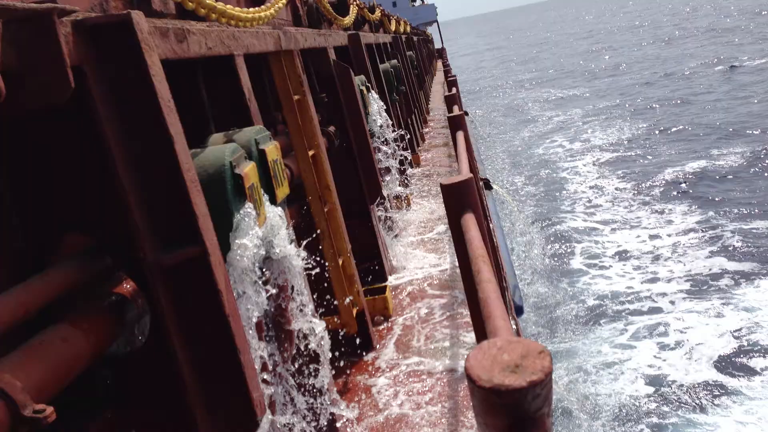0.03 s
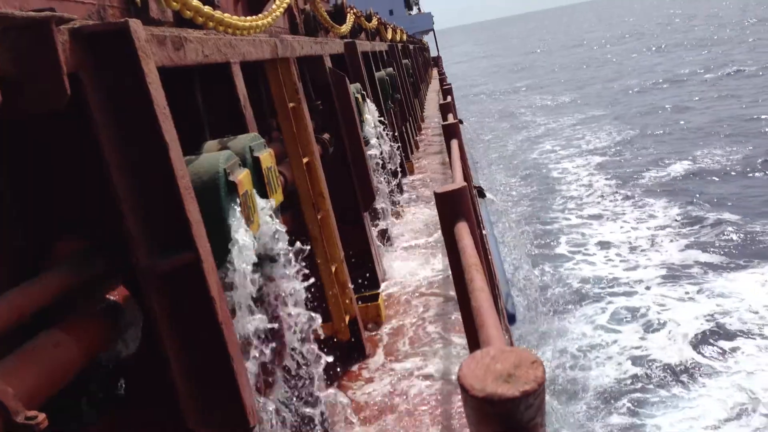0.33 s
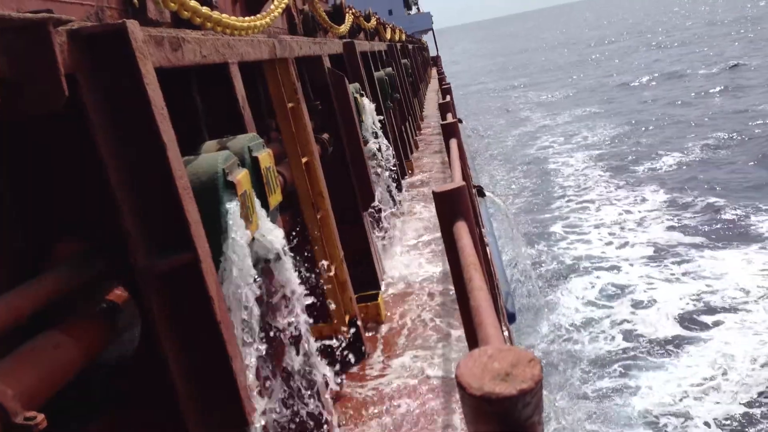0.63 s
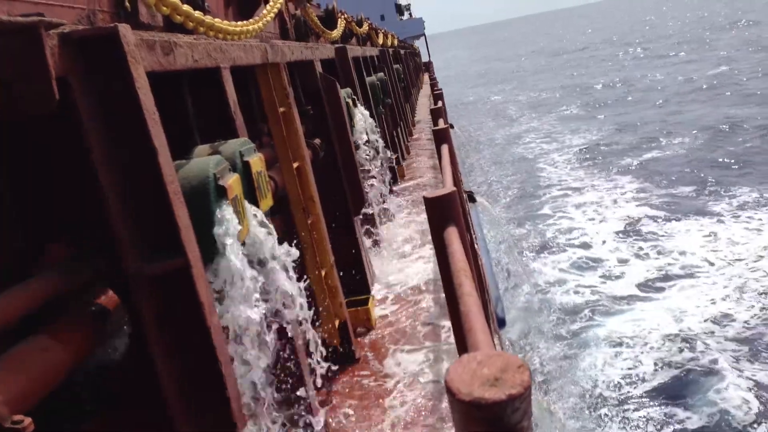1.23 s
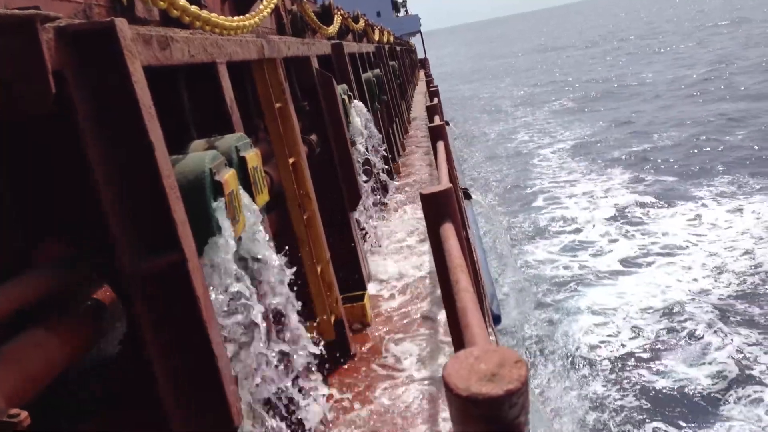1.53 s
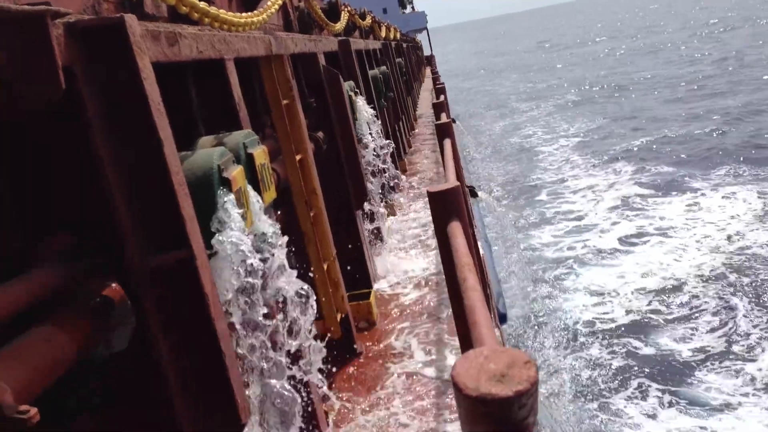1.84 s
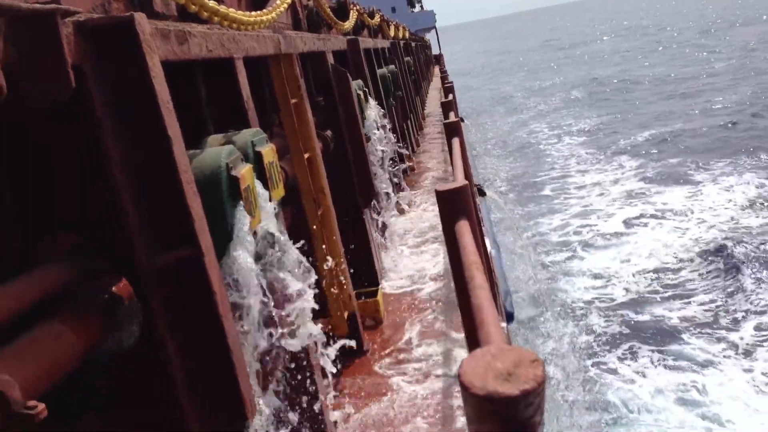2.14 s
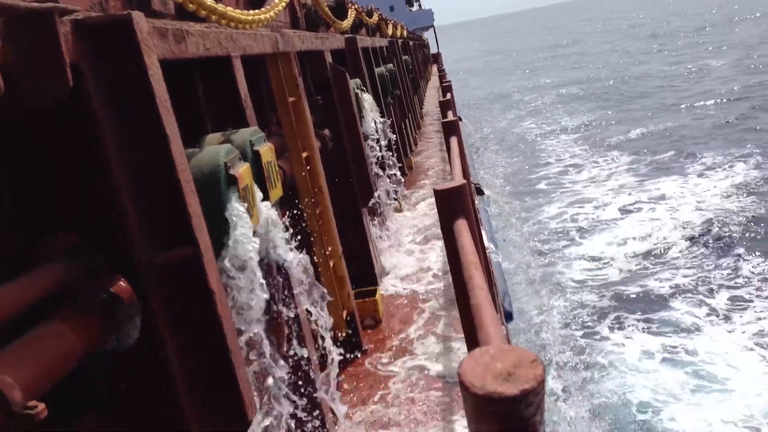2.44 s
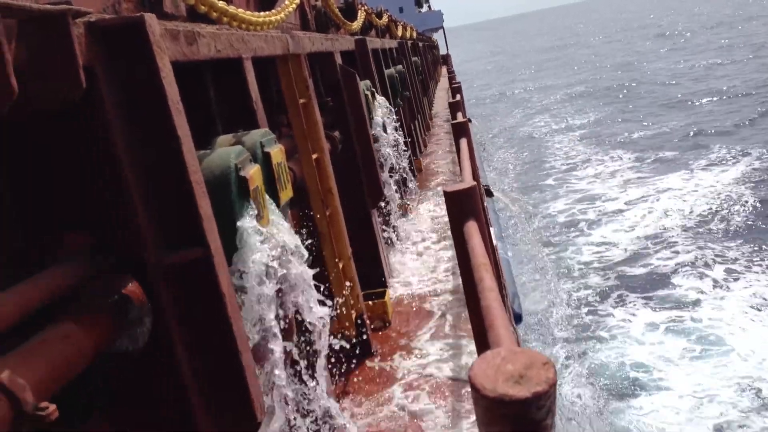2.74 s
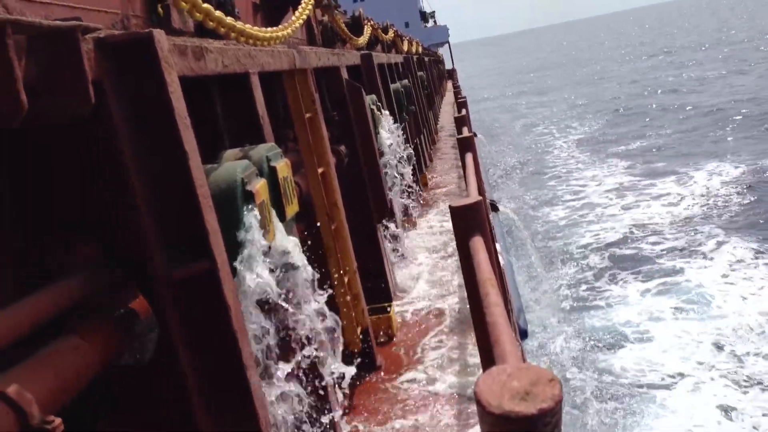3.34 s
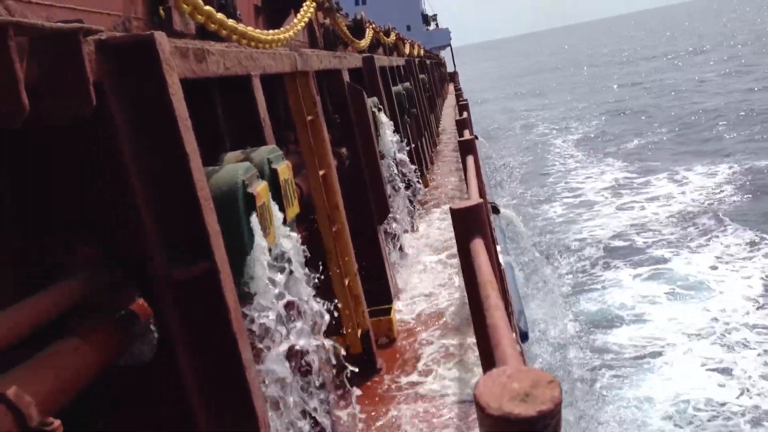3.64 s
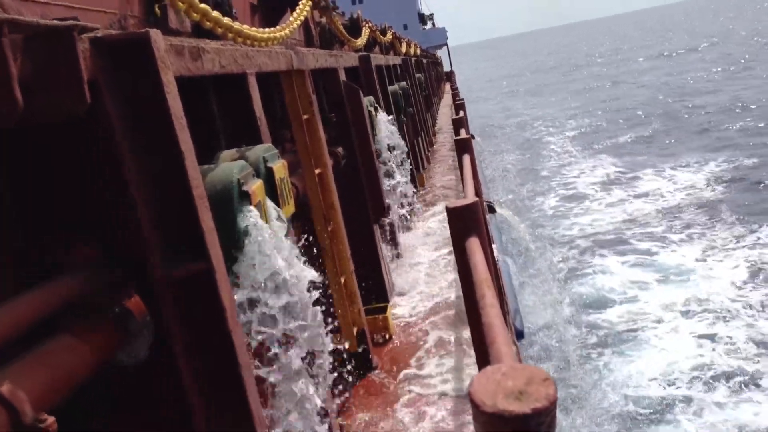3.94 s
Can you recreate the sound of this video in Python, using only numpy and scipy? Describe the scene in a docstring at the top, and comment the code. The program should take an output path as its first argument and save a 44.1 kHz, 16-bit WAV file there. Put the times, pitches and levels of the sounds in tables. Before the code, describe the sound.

Water gushes from vents and splashes steadily onto a ship's steel deck, bubbling and spraying, with occasional sharper slaps. The ship and sea drone low underneath, while wind buffets the microphone in short thumps, mostly around the middle.

```python
"""Steel side deck of a ship under way. Water gushes from tank vents and lands in lumps,
bursting into drops, ringing bubbles and spray. Ship and sea drone low underneath.
Wind eddies buffet the microphone in short, blunt thumps.
Big lumps of water slap the plating: a crack, then a scatter of drops."""
import sys
import numpy as np
from scipy import signal
from scipy.fft import rfft, irfft
from scipy.io import wavfile
from scipy.ndimage import uniform_filter1d

SR = 44100
rng = np.random.default_rng(int(sys.argv[2]) if len(sys.argv) > 2 else 0)


def bounce(signal):
    """Save signal as a 16-bit WAV file at the path given by the first command-line argument."""
    frames = np.transpose(np.atleast_2d(signal))
    limited = np.clip(frames, -1, 1)
    pcm = np.round(limited * 32767).astype(np.int16)
    wavfile.write(sys.argv[1], SR, pcm)


N = 176400


def undb(db):
    """Decibels to gain."""
    return 10 ** (np.asarray(db) / 20)


def unit(x):
    """Scale to rms 1."""
    return x / np.sqrt(np.mean(x ** 2) + 1e-18)


def colour(x, points, shift=1):
    """Causal filter of unit power gain through (Hz, dB) points; shift scales their frequencies."""
    hz, db = np.array(points).T
    n = 2 * len(x)
    bins_hz = np.arange(n // 2 + 1) * SR / n
    gain = unit(undb(np.interp(np.log(bins_hz + 1), np.log(hz * shift), db)))
    cepstrum = irfft(np.log(gain))
    cepstrum[1:n // 2] *= 2  # fold to minimum phase
    cepstrum[n // 2 + 1:] = 0
    return irfft(rfft(x, n) * np.exp(rfft(cepstrum)))[:len(x)]


def walk(rate_hz):
    """Smooth random wander, rms 1."""
    span = int(SR / rate_hz)
    smoothed = uniform_filter1d(rng.standard_normal(N), span, mode="wrap")
    return unit(uniform_filter1d(smoothed, span, mode="wrap"))


def impacts(per_s, spread_db):
    """Impulses of random time and size."""
    hits = rng.random(N) < per_s / SR
    return hits * undb(spread_db * np.clip(rng.standard_normal(N), -2.5, 2.5))


def fade(x, decay_s):
    """Exponential tail on each impulse."""
    return signal.lfilter([1], [1, -np.exp(-1 / (decay_s * SR))], x)


def mix(a, b, share):
    """Blend; share is b's fraction of the power."""
    share = np.clip(share, 0, 1)
    return np.sqrt(1 - share) * unit(a) + np.sqrt(share) * unit(b)


def lumps(steady_s=0.14):
    """Power of the landing water, mean about 1: each lump arrives at once and drains away."""
    power = fade(impacts(per_s=130, spread_db=4) ** 2, decay_s=0.014) + 1e-9
    # the vents deliver about the same amount in any span of steady_s
    return power / uniform_filter1d(power, int(steady_s * SR))


def patter(wash_share):
    """Separate drop impacts in a wash of drops too fine to tell apart."""
    drops = impacts(per_s=5000, spread_db=2.5) * np.sign(rng.standard_normal(N))
    return mix(drops, rng.standard_normal(N), wash_share)


def bubbles(median_hz=2189, spread_oct=0.3, decay_cycles=17.2, rise_per_decay=0.0346, size=2048):
    """Air trapped in the water on deck rings briefly, rising in pitch."""
    out = np.zeros(N + size)
    t = np.arange(size) / SR
    births = impacts(per_s=350, spread_db=7)
    octaves = spread_oct * rng.standard_normal(N)
    for i in np.flatnonzero(births):
        hz = min(median_hz * 2 ** octaves[i], 7800)
        age = t * hz / decay_cycles
        phase = 2 * np.pi * hz * t * (1 + rise_per_decay * age / 2)
        out[i:i + size] += births[i] * np.exp(-age) * np.sin(phase)
    return unit(out[:N])


def stream(splash_surge=0.52, spray_surge=0.45):
    """Falling water: splash, bubbles and spray surge with the same lumps, over an even pour."""
    # stream envelope (time [s], body gain [dB], spray gain [dB])
    flow = [(0.15, -30.5, -35), (0.29, -29.5, -34.5), (0.43, -28.5, -34.5), (0.57, -31, -34.0),
            (0.71, -31.5, -34.5), (0.85, -31.5, -33.0), (0.99, -29.5, -32.5), (1.13, -31, -34.5),
            (1.27, -31, -34.5), (1.41, -31.5, -33.5), (1.55, -31, -34.0), (1.69, -28.5, -32),
            (1.83, -30, -36), (1.97, -31, -34), (2.11, -32, -34), (2.25, -31.5, -34.5),
            (2.39, -32.0, -33.5), (2.53, -30.5, -35.5), (2.67, -32.5, -35.5), (2.81, -31.5, -37.5),
            (2.95, -32.5, -36.5), (3.09, -31.5, -34), (3.23, -30.5, -36), (3.37, -31.5, -36.5),
            (3.51, -30.5, -35.5), (3.65, -30.0, -34), (3.79, -30, -34.5), (3.93, -28.5, -34.0)]
    # splash and spray spectra (frequency [Hz], relative density [dB])
    splash_spectrum = [(40, -39), (300, -26.5), (600, -11), (1000, -6.5), (1500, -2.5), (2000, 0.5),
                       (2450, 1), (2900, -2.5), (3600, -9.5), (6000, -25.5)]
    spray_spectrum = [(100, -50), (1500, -29), (3000, -6), (4000, -4), (5300, 0.5), (6100, -2.5),
                      (7200, -2), (9000, -8), (12000, -10.5), (15500, -14)]
    t = np.arange(N) / SR
    time_s, body_db, spray_db = np.array(flow).T
    power = lumps()
    heavy = np.sqrt(1 + splash_surge * (power - 1))  # surge: share of power arriving in lumps
    fine = np.sqrt(1 + spray_surge * (power - 1))
    splash = undb(-0.5) * colour(heavy * patter(wash_share=0.25), splash_spectrum)
    body = splash + undb(-7) * heavy * bubbles()
    spray = undb(0.32) * colour(fine * patter(wash_share=0.53), spray_spectrum)
    return body * undb(np.interp(t, time_s, body_db)) + spray * undb(np.interp(t, time_s, spray_db))


def drone(level_db=-40.5, waver_db=0.7):
    """Low, wavering rumble of the ship and the sea along its hull."""
    # rumble spectrum (frequency [Hz], relative density [dB])
    spectrum = [(20, -52), (32, -43), (50, -26.5), (80, -17), (105, -10.5), (130, -6.5), (175, -1),
                (240, -5), (400, -11), (550, -6.5), (800, -9), (1600, -26)]
    gain = undb(level_db + waver_db * walk(rate_hz=7.2))
    return gain * colour(rng.standard_normal(N), spectrum)


def wind(lopside=0.26, push_s=0.005, size=8192):
    """Each eddy swells fast on the microphone and dies slower; short ones are more push than flutter."""
    # eddies (peak time [s], length [s], level [dB], spectrum shift [octaves])
    buffets = [(0.334, 0.054, -37, 0.19), (0.39, 0.019, -21.5, 0.31), (0.637, 0.016, -29, 0.056),
               (.687, .02, -33, 0.17), (1.51, 0.035, -46, -1.2), (1.592, 0.015, -24, -0.38),
               (1.64, 0.064, -33, -0.54), (1.672, 0.0068, -17, 0.75), (1.686, 0.024, -16.5, -0.22),
               (1.71, .03, -18, -0.28), (1.755, 0.036, -17, 0.12), (1.785, 0.022, -21.5, -0.25),
               (1.814, 0.013, -28.5, -0.34), (1.867, 0.018, -23, 0.22), (1.902, 0.018, -11, -0.0069),
               (1.924, 0.017, -19, 0.055), (2.09, 0.038, -36.5, -.1), (2.223, 0.022, -21, 0.21),
               (2.293, 0.02, -31.5, -0.43), (2.549, 0.017, -30.5, 0.18), (2.584, 0.011, -25.5, -.1),
               (2.643, 0.0087, -9, 0.014), (2.856, 0.016, -27, -0.54), (2.914, 0.024, -35, -0.28),
               (3.115, 0.0094, -31.5, 0.12), (3.15, 0.012, -19.5, -0.13), (3.166, 0.027, -26.5, -.1),
               (3.211, 0.033, -29, -0.012), (3.481, 0.026, -36, -1.2), (3.636, 0.024, -31, -0.2),
               (3.659, 0.012, -23, 0.056), (3.851, 0.025, -23, 0), (3.957, 0.03, -22.5, 0.52)]
    # buffet spectrum (frequency [Hz], relative density [dB])
    spectrum = [(20, -52), (45, -27), (80, -36), (125, -5.5), (190, 1.5), (260, 4.5), (350, -0.5), (480, 0),
                (650, -6.5), (900, -18), (1400, -26.5), (3500, -50)]
    out = np.zeros(N + 2 * size)
    t = (np.arange(size) - size // 2) / SR
    push = 1.0 * (t == 0)
    for time_s, length_s, level_db, shift_oct in buffets:
        width_s = length_s * (1 + lopside * np.sign(t))
        swell = np.exp(-2 * (t / width_s) ** 2)
        flutter = swell * rng.standard_normal(size)
        pressure = mix(flutter, push, share=push_s / length_s)
        thump = unit(colour(pressure, spectrum, shift=2.0 ** shift_oct))
        i = int(time_s * SR) - size // 2
        out[i:i + size] += undb(level_db) * thump * np.sqrt(np.mean(swell ** 2))
    return out[:N]


def burst(hits, crack_db=20, decay_s=0.0072):
    """Each hit cracks, crack_db above the short scatter of drops that follows."""
    scatter = fade(hits, decay_s) * rng.standard_normal(N)
    return undb(crack_db) * hits + scatter


def slaps():
    """Big lumps hit the plating, each with a mid-range body and a bright spray."""
    # slaps on deck (time [s], body gain [dB], spray gain [dB])
    hits = [(.4925, -26, -42), (.6485, -42, -26.5), (.8005, -27, -23.5), (.9448, -19, -30),
            (.9735, -26, -26), (1.0425, -38, -24.5), (1.1838, -23.5, -30.5), (1.282, -23, -30),
            (1.54, -24, -36), (2.417, -23.5, -28.5), (2.466, -24.5, -35), (2.6093, -22, -23.5),
            (2.8372, -22, -25.5)]
    # slap body and spray spectra (frequency [Hz], relative density [dB])
    body_spectrum = [(100, -54), (1000, -18.5), (1500, -6), (1900, 1.5), (2400, 8.5), (2900, -3.5),
                     (3600, -15), (7000, -36.5)]
    spray_spectrum = [(500, -30), (2500, 7), (4000, 0), (5500, 5), (7500, -2), (9000, -10.5), (15000, -9)]
    body, spray = np.zeros((2, N))
    for time_s, body_db, spray_db in hits:
        i = int(time_s * SR)
        body[i], spray[i] = undb(body_db), undb(spray_db)
    return colour(burst(body), body_spectrum) + colour(burst(spray), spray_spectrum)


def scene():
    """Water, wind and ship at one microphone."""
    return (stream() + slaps() + wind() + drone())[None]


def record(dry, start_s=0.12, top_hz=15600):
    """Silence until start_s; steep low-pass at top_hz."""
    running = np.arange(N) / SR >= start_s
    lowpass = signal.ellip(12, 0.1, 80, top_hz, fs=SR, output="sos")
    return signal.sosfilt(lowpass, dry * running)


dry = scene()
out = record(dry)
bounce(out)
```